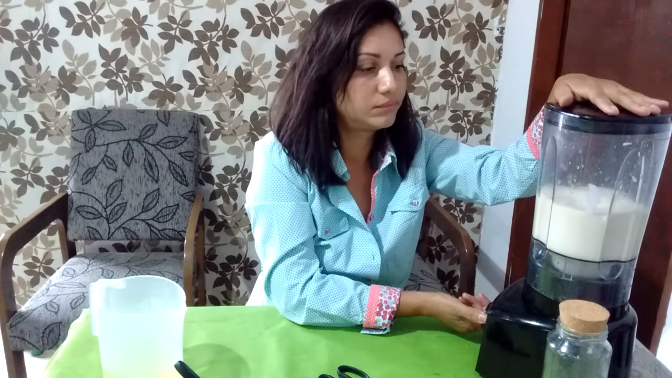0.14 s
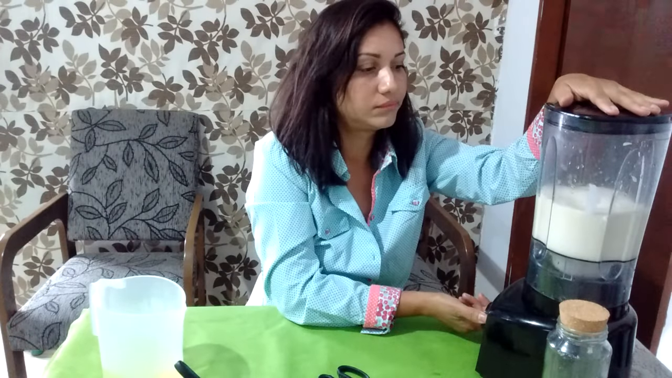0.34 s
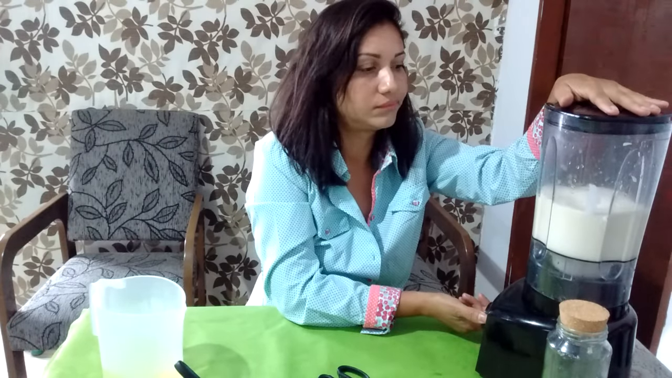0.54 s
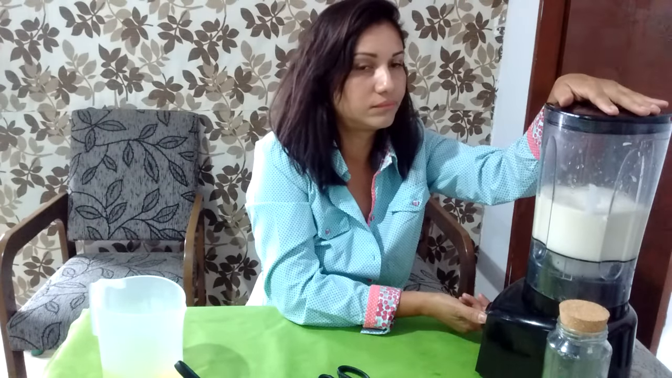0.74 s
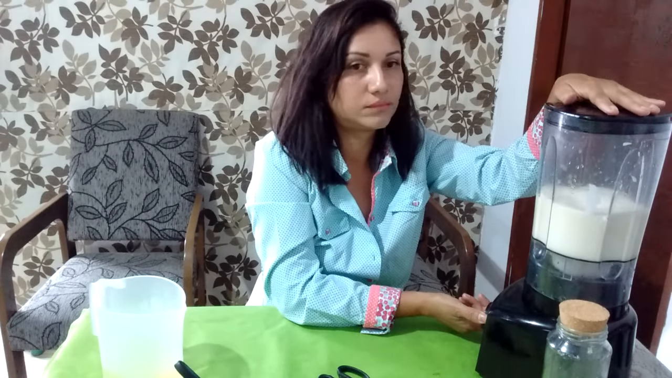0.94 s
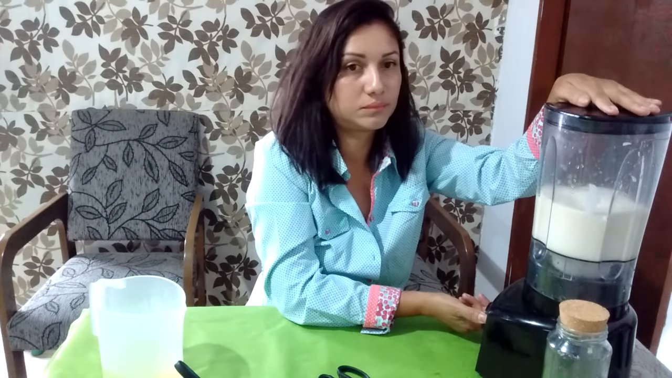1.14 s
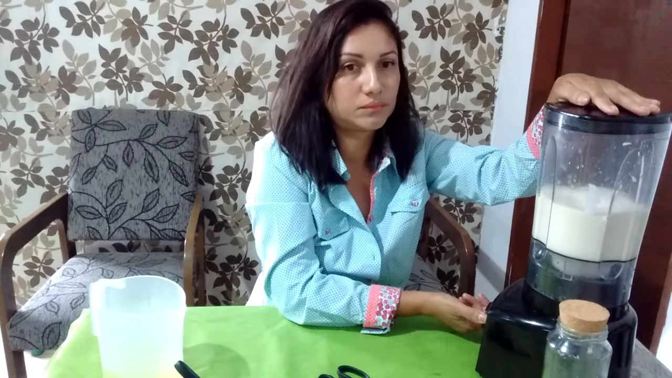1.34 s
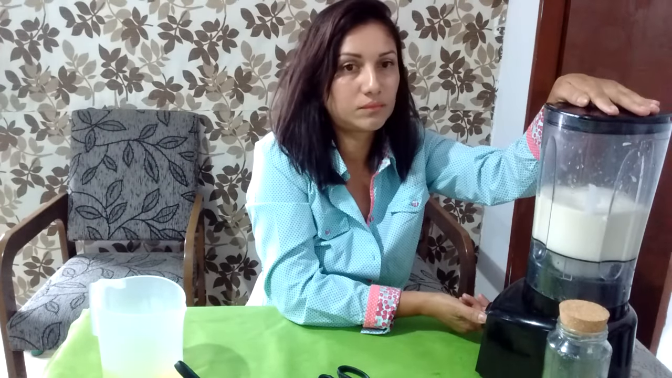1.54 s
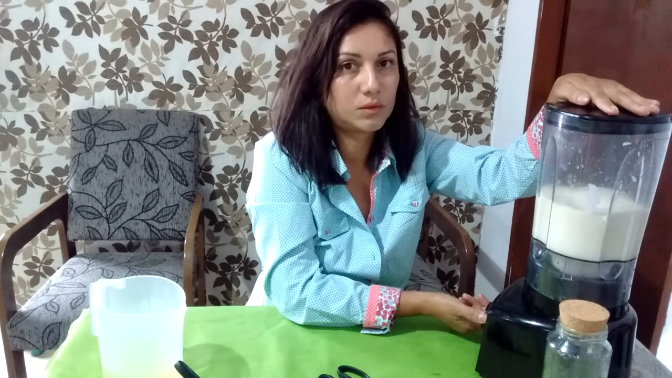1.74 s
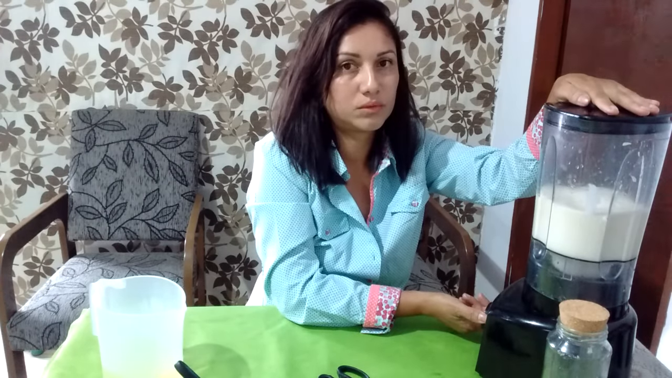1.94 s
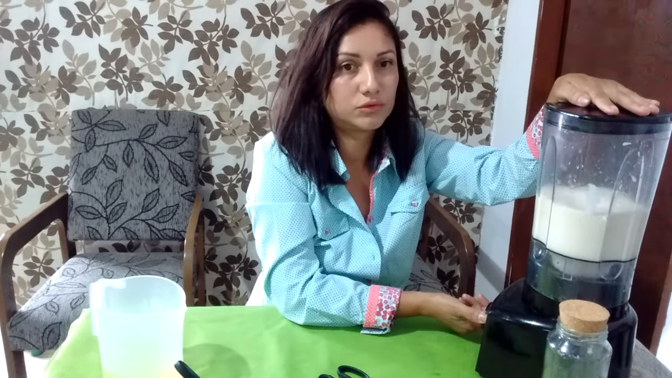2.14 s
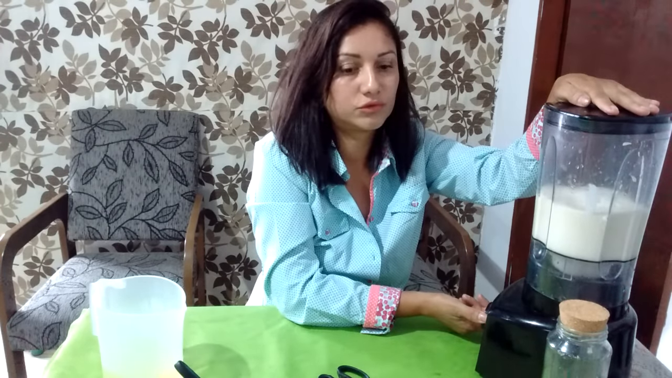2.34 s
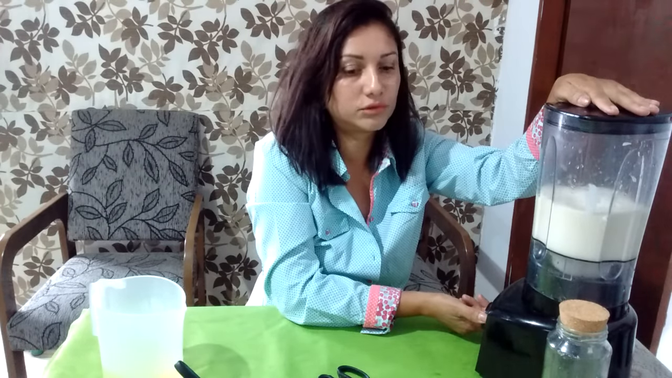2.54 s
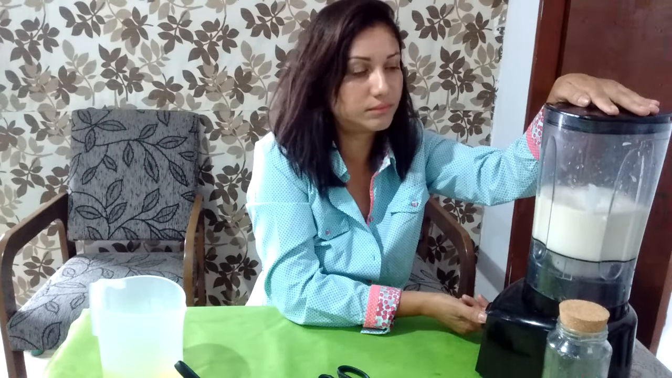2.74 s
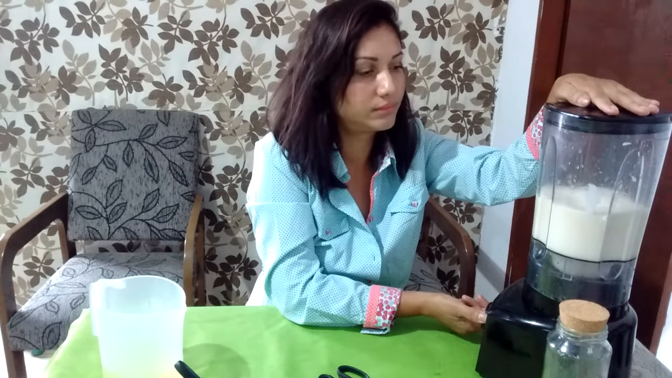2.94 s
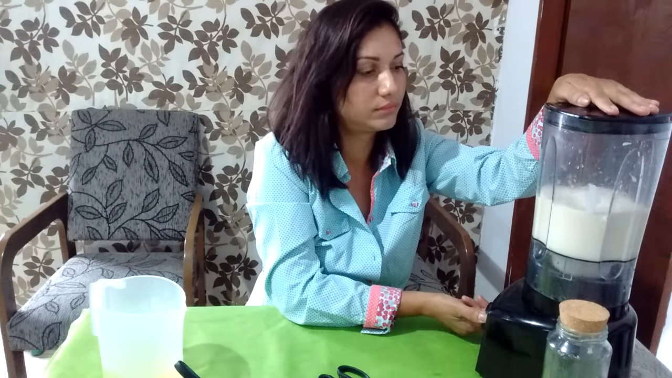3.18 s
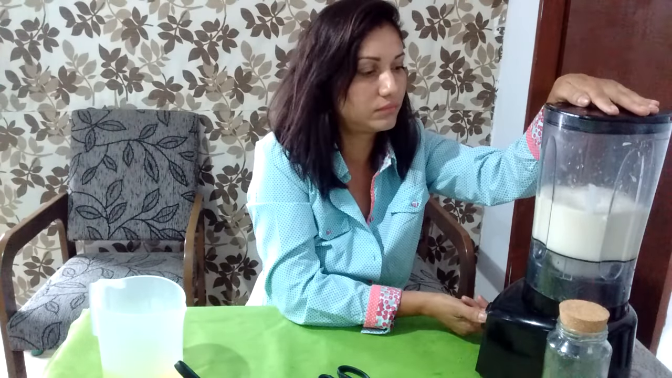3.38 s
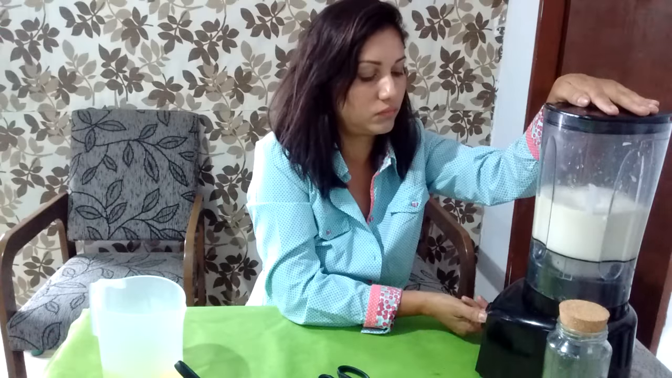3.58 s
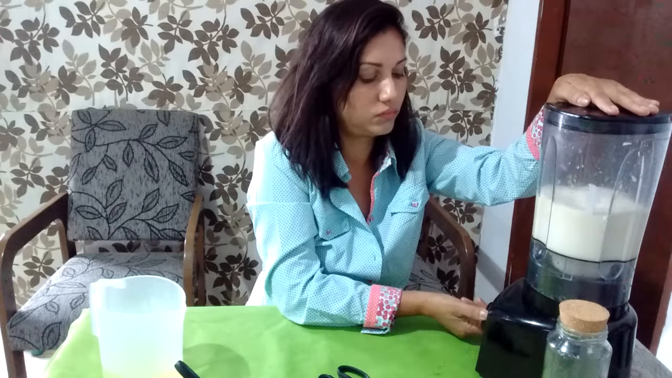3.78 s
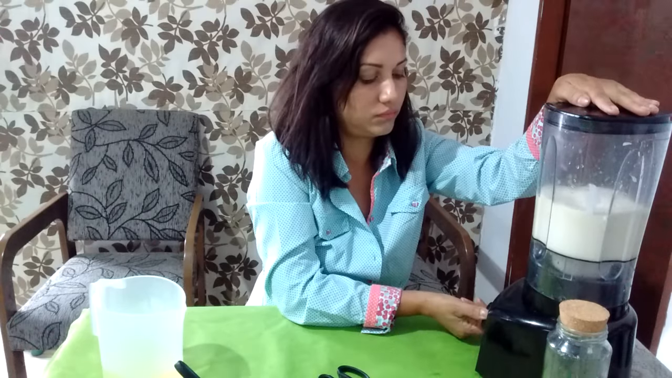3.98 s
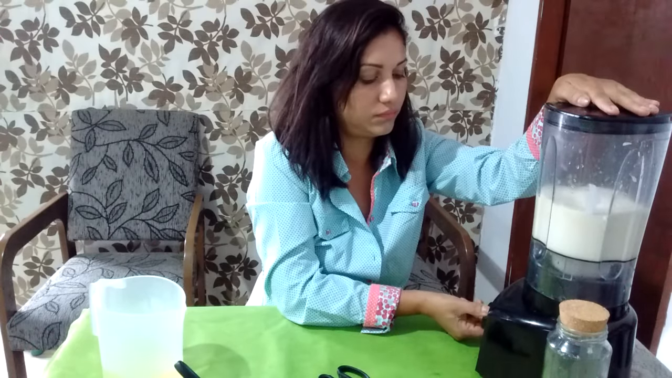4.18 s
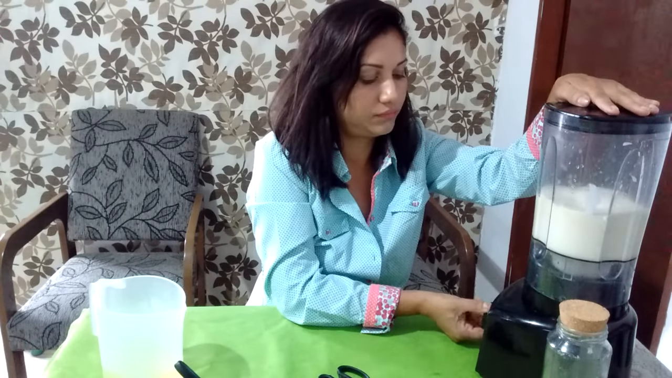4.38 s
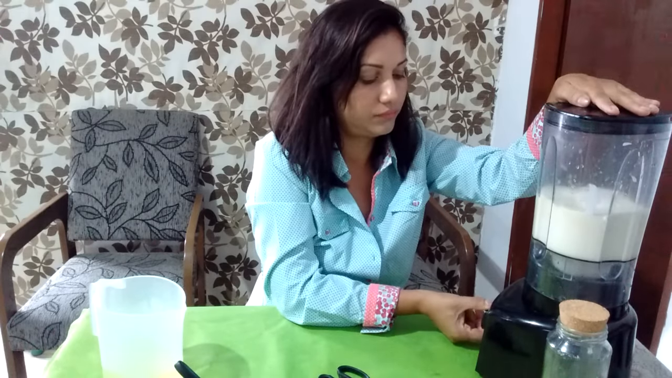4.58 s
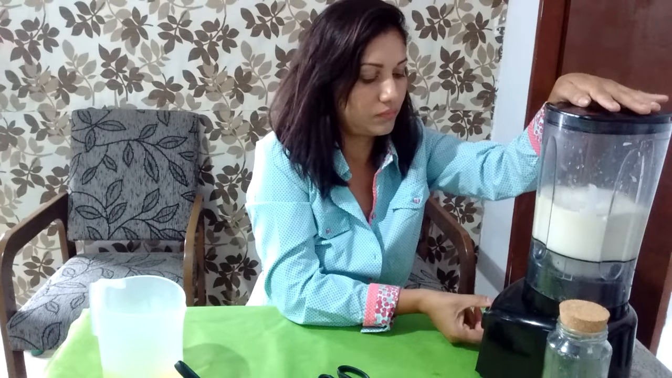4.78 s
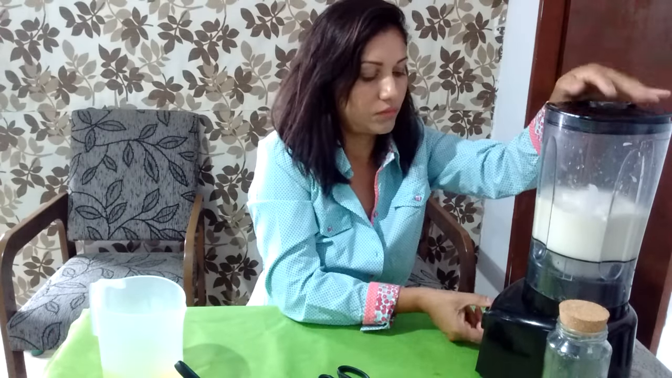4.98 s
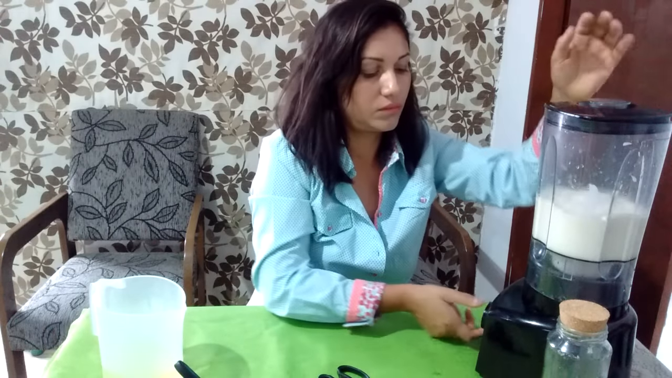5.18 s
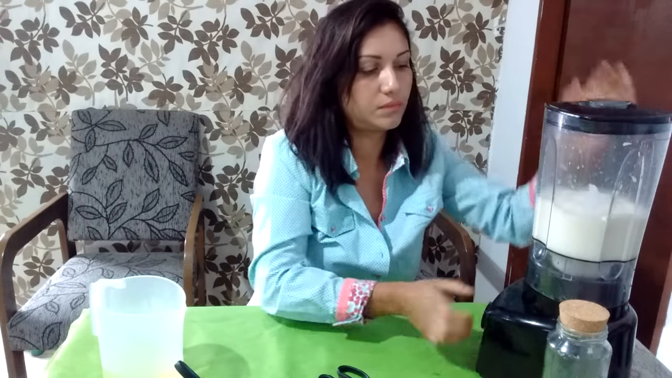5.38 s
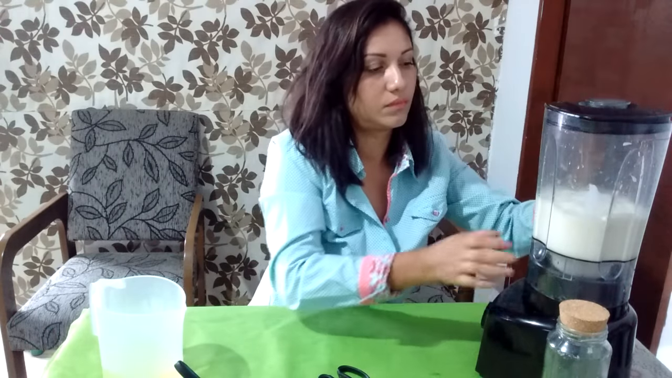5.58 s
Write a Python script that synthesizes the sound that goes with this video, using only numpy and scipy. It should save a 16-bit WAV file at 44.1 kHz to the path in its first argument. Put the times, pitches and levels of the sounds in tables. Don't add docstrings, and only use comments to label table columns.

```python
import sys
import numpy as np
from scipy import signal
from scipy.fft import rfft, irfft, next_fast_len
from scipy.io import wavfile
from scipy.ndimage import uniform_filter1d, map_coordinates

SR = 44100
rng = np.random.default_rng(int(sys.argv[2]) if len(sys.argv) > 2 else 0)


def store_wav(level_fs):
    pcm = np.round(np.clip(np.atleast_2d(level_fs), -1, 1) * 32767)
    wavfile.write(sys.argv[1], SR, pcm.T.astype(np.int16))


def level_to_linear(level):
    exponent = np.asarray(level, float) / 20
    return 10 ** exponent


N = 247689
POWER_OFF_S = 4.4


def unit(x):
    return x / np.sqrt(np.mean(x ** 2) + 1e-20)


def along(points, hz):
    f, v = np.transpose(points)
    return np.interp(np.log(hz + 1), np.log(f + 1), v)


def curves(rows):
    s, *cols = np.transpose(rows)
    return [np.interp(np.arange(N) / SR, s, c) for c in cols]


def after(s):
    return np.maximum(np.arange(N) / SR - s, 0)


def wobble(rate):
    knots = rng.standard_normal(int(N * rate / SR) + 4)
    return map_coordinates(knots, [np.arange(N) * rate / SR])


def filtered(x, response):
    m = next_fast_len(x.shape[-1] + 8192)
    return irfft(rfft(x, m) * response(np.fft.rfftfreq(m, 1 / SR)), m)[..., :x.shape[-1]]


def patchy(depth_db):
    z = signal.stft(rng.standard_normal((2, N)), nperseg=512)[2]
    field = uniform_filter1d(rng.standard_normal(z.shape[1:]), size=6, axis=0)
    field = uniform_filter1d(field, size=10, axis=1)
    return signal.istft(z * level_to_linear(depth_db * unit(field)), nperseg=512)[1][:, :N]


# freq_hz, level_db
PORT_DIFFERENCE = [(100, -28), (1000, -28), (2400, -16), (3200, -25), (4500, -14), (6200, -26), (9500, -2),
                   (13000, -41)]


def ports(shared, own, extra_db):
    own = filtered(own, lambda hz: level_to_linear(np.minimum(along(PORT_DIFFERENCE, hz) + extra_db, 0)))
    return np.array([shared + own, shared - own])


# freq_hz, level_db (per Hz)
HOUSE_RUMBLE = [(30, -3), (60, -0.5), (150, 0.5), (250, -11.5), (400, -22.5), (900, -28), (2000, -37.5),
                (4000, -40.5), (6500, -58), (9000, -54), (15000, -69)]
THUD_DB, THUD_LUMPS_DB = -51, 10


def house():
    hands = np.arange(N) > 4.9 * SR
    rumble = filtered(rng.standard_normal((2, N)), lambda hz: level_to_linear(along(HOUSE_RUMBLE, hz)) * hz / (hz + 30))
    rumble *= level_to_linear(-36.5 + 1.1 * wobble(4.2) + 2.0 * hands) / np.std(rumble[0])
    lumps = level_to_linear(THUD_LUMPS_DB * wobble(9)) * rng.standard_normal(N)
    bumps = unit(filtered(lumps, lambda hz: hz / (hz + 25) / (1 + (hz / 60) ** 3)))
    return rumble + level_to_linear(THUD_DB + 14.0 * hands) * bumps * [[1], [.1]]


# freq_hz, t60_s
ROOM_DECAY = [(200, 0.45), (1000, 0.48), (5000, 0.37), (12000, 0.42)]


def walls(x):
    hz, t, z = signal.stft(rng.standard_normal((2, SR * 2 // 3)), SR, nperseg=256)
    decay = level_to_linear(-60 * t / along(ROOM_DECAY, hz)[:, None])
    tail = signal.istft(z * decay, SR, nperseg=256)[1]
    late = np.pad(x, (130, 0))[None]
    return signal.fftconvolve(late, tail / np.linalg.norm(tail[0]), axes=1)[:, :N]


# freq_hz, level_db (per Hz)
SNAP_COLOUR = [(300, -10), (2000, 3), (4500, 0), (6500, -6), (9000, -12), (15000, -27)]
BLOW = 16


def knocks(events, modes, knock_db, scuff_s):
    snaps, blows, t = np.zeros(N + SR), np.zeros(N + SR), np.arange(SR // 8) / SR
    for s, db, rel_db, snap_hz in events:
        start = round(s * SR)

        def bright(hz):
            return level_to_linear(along(SNAP_COLOUR, hz)) / (1 + (0.84 * snap_hz / (hz + 1)) ** 8)

        grit = unit(filtered(rng.standard_normal(len(t)), bright))
        grit *= 1.35 * level_to_linear(-60 * t / 0.0071) + 0.44 * level_to_linear(-60 * t / 0.051)
        drift = np.cumsum(rng.standard_normal(len(t))) / np.sqrt(SR * .004)
        ping = 2.6 * level_to_linear(-60 * t / .016) * np.sin(2 * np.pi * snap_hz * t + drift)
        snaps[start:][:len(t)] += level_to_linear(db) * (1 - np.exp(-t / 0.00064)) * (ping + grit)
        scuff = rng.standard_normal(len(t)) + BLOW * (t == 0)
        blows[start:][:len(t)] += level_to_linear(db + rel_db + knock_db - 60 * t / scuff_s) * scuff

    def hollow(f):
        return sum((-1) ** k * level_to_linear(db) * 1j * f * w / (c * c - f * f + 1j * f * w)
                   for k, (c, w, db) in enumerate(modes))

    return snaps[:N] + filtered(blows[:N], hollow)


# start_s, snap_level_db, knock_over_snap_db, snap_pitch_hz
LID_CONTACTS = [
    (4.95, -51, 8, 6540),
    (5.026, -49.5, 26, 4050),
    (5.0305, -55, 26, 1800),
    (5.035, -60, 24, 4050),
    (5.107, -60, 6, 8100),
    (5.26, -75, 1, 800),
]
# freq_hz, width_hz, level_db
LID_RESONANCES = [(200, 65, 12), (430, 260, 6.5), (930, 520, 2), (1410, 610, 0.5), (2410, 860, -4.5),
                  (4100, 130, -10)]


def lid_knocks():
    return knocks(LID_CONTACTS, LID_RESONANCES, knock_db=5.0, scuff_s=0.037)


# start_s, snap_level_db, knock_over_snap_db, snap_pitch_hz
DIAL_CLICKS = [
    (3.794, -28.5, 7, 6260),
    (4.106, -28, 18, 6600),
    (4.3885, -21.5, 4, 4440),
    (4.3905, -34, 4, 6500),
    (4.4945, -34.5, 22.5, 5300),
    (4.4962, -32, 7, 7500),
    (4.504, -38, 18, 4330),
]
# freq_hz, width_hz, level_db
HELD_BASE_RESONANCES = [(135, 60, -4.5), (242, 100, 0), (360, 34, 9.5), (560, 160, -2.5), (860, 135, 1.5),
                        (1420, 450, -10.5), (2310, 810, -17.5), (4530, 270, -25)]
# start_s, snap_level_db, knock_over_snap_db, snap_pitch_hz
SWITCH_BOUNCES = [
    (4.8140, -30, 17.5, 4600),
    (4.8185, -33.5, 18.5, 4420),
    (4.8235, -37, 22, 2470),
    (4.829, -42, 24.5, 1510),
    (4.836, -49, 20, 1500),
    (4.856, -45, 21.5, 1990),
    (4.863, -48, 19, 4440),
]
# freq_hz, width_hz, level_db
BASE_RESONANCES = [(130, 100, -16), (222, 50, 0), (342, 19.5, 12.5), (483, 80, -7), (600, 130, -3),
                   (815, 49, 4), (1040, 200, -15), (1380, 65, -5), (1740, 270, -15), (2260, 840, -19),
                   (4550, 370, -23.5)]


def dial_knocks():
    detents = knocks(DIAL_CLICKS, HELD_BASE_RESONANCES, knock_db=11.5, scuff_s=0.04)
    return detents + knocks(SWITCH_BOUNCES, BASE_RESONANCES, knock_db=13, scuff_s=0.028)


# time_s, shaft_hz (turns per second)
SHAFT_SPEED = [(0, 134.4), (.3, 136.2), (.5, 136.7), (.63, 134.8), (.76, 136.6), (1.1, 136.7),
               (1.62, 138.3), (1.8, 137.3), (2.14, 136.3), (2.27, 137), (2.42, 136.5), (2.76, 138.3),
               (2.9, 135.5), (3.08, 134.6), (3.4, 139.5), (3.7, 135.4)]
# time_s, roar_level_db
VORTEX_HEAVE = [(0.0, -31), (0.02, -31.5), (0.46, -33), (0.61, -31), (1.1, -32.5), (1.14, -31.5),
                (1.64, -33), (1.83, -30), (1.92, -33), (2.05, -31), (2.54, -33.5), (2.62, -31.5),
                (4.15, -31), (4.18, -33.5), (4.36, -31.5)]
# time_s, rattle_level_db, lower_sidebands_level_db
BEARING_PLAY = [(0, -6, -4), (.08, 2, -4), (.3, -0.5, -14), (.4, -5.5, 0), (.6, -5, 1), (.67, 2, -0.5),
                (.8, -3.5, 1), (1.08, -0.5, -6), (1.18, -2, 0), (1.26, -0.5, -1), (1.9, 0, -2.5),
                (2.7, 0.5, -0.5), (2.9, -2, -1), (3.1, -3, -2), (3.35, 1, 2), (3.52, -6, 1.5),
                (3.78, 4, -7), (3.83, -3, 5)]
SPEED_STEPS = [
    3.794,
    4.106,
    4.3885,
    4.4945,
]
STEP_HZ, STEP_S, SAG_HZ_PER_S = 7, .03, 19
CHURN_DB, HEAVE, SPRAY_DB = -23, 0.91, 1
SPRAY_DB_PER_HZ, RATTLE_DB_PER_HZ = 0.05, 0.13
BLUR_PER_HZ = 0.0085
CUT_DB, CUT_S = 4, 0.0071
SETTLE_S, SETTLE_DB_PER_S = 0.13, 67


def drive():
    (loaded_hz,), (flow_db,) = curves(SHAFT_SPEED), curves(VORTEX_HEAVE)
    lost_hz = sum(STEP_HZ * (1 - np.exp(-after(s) / STEP_S)) for s in SPEED_STEPS)
    lost_hz = lost_hz + SAG_HZ_PER_S * np.minimum(after(SPEED_STEPS[0]), 1)
    shaft_hz = uniform_filter1d(loaded_hz, size=4000) - lost_hz
    collapse_db = CUT_DB * (1 - np.exp(-after(POWER_OFF_S) / CUT_S))
    collapse_db = collapse_db + SETTLE_DB_PER_S * after(POWER_OFF_S + SETTLE_S)
    churn_db = CHURN_DB + HEAVE * (flow_db - flow_db.mean()) - collapse_db
    spray_db = SPRAY_DB - SPRAY_DB_PER_HZ * lost_hz
    rattle_db = np.array(curves(BEARING_PLAY)) - RATTLE_DB_PER_HZ * lost_hz
    return shaft_hz, churn_db, spray_db, rattle_db, BLUR_PER_HZ * lost_hz


BLADE_ORDERS = [-19, -34, -30.5, -40.5, -36]
BEARING_LINES = [-26, -26.5, -24, -37, -35]
# freq_hz, level_db
FEET_RESPONSE = [(100, -24), (111, -12), (116, -2), (124, 0.5), (130, 11), (136, -0.5)]
# freq_hz, level_db
CASE_RESPONSE = [(250, -11), (330, -22.5), (370, 5.5), (410, -4.5), (450, -10.5), (495, -0.5), (540, -1.5),
                 (590, -2), (660, -2), (695, -2.5), (722, 1.5), (785, 0), (860, -1.5), (950, -1)]
# freq_hz, level_db
MAINS_HUM = [(120, -31.5), (240, -26)]
BALL_ORDER = 3.29
SHAKE_DB = -20.5


def motor(shaft_hz, rattle_db, blur):
    turns, t = 2 * np.pi * np.cumsum(shaft_hz) / SR, np.arange(N) / SR

    def tone(k, db, sway_db):
        sway = sway_db * (wobble(14) + .6 * wobble(3.5))
        flutter = (.05 * k + blur) * wobble(25)
        return level_to_linear(db + sway) * np.sin(k * turns + flutter + rng.uniform(0, 2 * np.pi))

    total = tone(1, SHAKE_DB + along(FEET_RESPONSE, shaft_hz), sway_db=1.6)
    for k, db in zip(range(2, 7), BLADE_ORDERS):
        total += tone(k, db + 5 + along(CASE_RESPONSE, k * shaft_hz), sway_db=2.0)
    for k, db in zip(BALL_ORDER + np.arange(len(BEARING_LINES)), BEARING_LINES):
        play_db = rattle_db[int(k < BALL_ORDER + 1.5)]
        total += tone(k, db + 4.0 + play_db + along(CASE_RESPONSE, k * shaft_hz), sway_db=1.5)
    for hz, db in MAINS_HUM:
        total += level_to_linear(db + 2.0 + 0.74 * wobble(8.8)) * np.sin(2 * np.pi * hz * t)
    return total * level_to_linear(-100 * after(POWER_OFF_S))


# freq_hz, level_db (per Hz)
CHURN_COLOUR = [(40, -30), (105, 0), (160, -4), (300, -11), (500, -7), (800, -4), (1300, -11), (2100, -14),
                (3200, -17), (3700, -23.5), (5500, -32), (8000, -37.5), (10000, -46), (15000, -75.5)]
# freq_hz, width_hz, level_db
JAR_RESONANCES = [(96, 31, -4.5), (166, 30, 1), (224.4, 59, 11), (248, 33, 8.5), (355.4, 47, 7),
                  (488, 27, 2), (504, 24, -7.5), (638, 20, -3.5), (719, 14, 6), (850, 82, 3), (1053, 51, 6),
                  (1157, 40, 7), (1313.8, 25.4, 16.5), (1378, 7, 14.5), (1433, 43, 9.5), (1605, 107, 6),
                  (4150, 270, 4), (4880, 190, 3.5), (8090, 100, 7.5), (10000, 610, 3), (11860, 310, 15.5),
                  (13200, 580, 21.5), (13800, 300, 8), (14750, 500, 17)]
JAR_FADE_S, JAR_LEFT = 0.077, 0.33


def jar_peaks(hz):
    dips_db, boost = 0, 0
    for c, w, db in JAR_RESONANCES:
        bell = 1 / (1 + (2 * (hz - c) / w) ** 2)
        if db < 0:
            dips_db = dips_db + db * bell
        else:
            boost = boost + (level_to_linear(db) - 1) * bell
    return level_to_linear(dips_db) + boost


def churn(shaft_hz, churn_db, spray_db):
    def high(hz):
        return 1 / (1 + (2600 / (hz + 1)) ** 4)

    def driven_jar(hz):
        return level_to_linear(along(CHURN_COLOUR, hz)) * jar_peaks(hz)

    def idle_jar(hz):
        return level_to_linear(along(CHURN_COLOUR, hz) + 1.5) * jar_peaks(hz) ** JAR_LEFT

    throb = 1 + .07 * np.cos(2 * np.pi * np.cumsum(shaft_hz) / SR)
    surge = level_to_linear(0.029 * wobble(6.7) + 0.43 * wobble(70))
    swirl = patchy(depth_db=.6) * throb * surge
    driven = filtered(swirl, lambda hz: driven_jar(hz) * (1 - high(hz)))
    idle = filtered(swirl, lambda hz: idle_jar(hz) * (1 - high(hz)))
    roar = idle + (driven - idle) * np.exp(-after(POWER_OFF_S + SETTLE_S) / JAR_FADE_S)
    spits = patchy(depth_db=1.12) * throb * surge * level_to_linear(0.16 * wobble(450))
    spray = filtered(spits, lambda hz: driven_jar(hz) * high(hz))
    slosh = filtered(roar, lambda hz: 1 / (1 + (hz / 380) ** 6))
    slosh *= np.clip(4.6 * after(POWER_OFF_S), 0, 1.8)
    return level_to_linear(churn_db + 5) * (roar + slosh + level_to_linear(spray_db) * spray) / np.std(roar)


def scene():
    lid, dial = lid_knocks(), dial_knocks()
    echo, other = walls(level_to_linear(-5.5) * dial) + walls(level_to_linear(-5.5) * lid)
    contacts = ports(dial + lid + echo, other, extra_db=0.0)
    shaft_hz, churn_db, spray_db, rattle_db, blur = drive()
    blender = ports(*churn(shaft_hz, churn_db, spray_db), extra_db=-1.0)
    blender = blender + motor(shaft_hz, rattle_db, blur)
    return ports(*house(), extra_db=6) + contacts + blender


def top_cut(x):
    return signal.sosfilt(signal.butter(12, 15660, fs=SR, output="sos"), x)


# freq_hz, lead_cycles
PORT_LEAD = [(0, -.495), (240, -.458), (330, -.395), (1650, 0), (2000, .1), (3200, .5), (6350, 1.5),
             (8100, 2), (10300, 2.5), (13700, 3.5), (17000, 4.5)]
# freq_hz, level_db
PORT_BALANCE = [(60, -1), (137, -.3), (240, -2.8), (700, -2.4), (1100, .4), (2000, 2.3), (4200, 1.4),
                (4800, .6), (8500, 8), (10000, 6.5), (11500, 1.5), (15000, 0)]
HISS_DB = -58.5
SHARED_HISS_DB, SHARED_HISS_TOP_HZ = -55.5, 8500
FULL, KNEE = .74, 5
TOP_HZ = 15600


def record(dry):
    def lead(hz):
        return np.exp(2j * np.pi * np.interp(hz, *np.transpose(PORT_LEAD)))

    def hiss_colour(hz):
        return .15 + 0.82 / (1 + (SHARED_HISS_TOP_HZ / (hz + 1)) ** 6)

    def shared_colour(hz):
        return 1 / (1 + (3500 / (hz + 1)) ** 2) / (1 + (hz / SHARED_HISS_TOP_HZ) ** 6)

    right = filtered(dry[1], lambda hz: level_to_linear(along(PORT_BALANCE, hz)) * lead(hz))
    hiss = level_to_linear(HISS_DB) * filtered(rng.standard_normal(dry.shape), hiss_colour)
    shared_hiss = level_to_linear(SHARED_HISS_DB) * filtered(rng.standard_normal(N), shared_colour)
    both = np.array([dry[0], right]) + hiss + [shared_hiss, filtered(shared_hiss, lead)]
    rounded = both / (1 + np.abs(both / FULL) ** KNEE) ** (1 / KNEE)
    return top_cut(filtered(rounded, lambda hz: hz < TOP_HZ))


dry = scene()
out = record(dry)
store_wav(out)
```